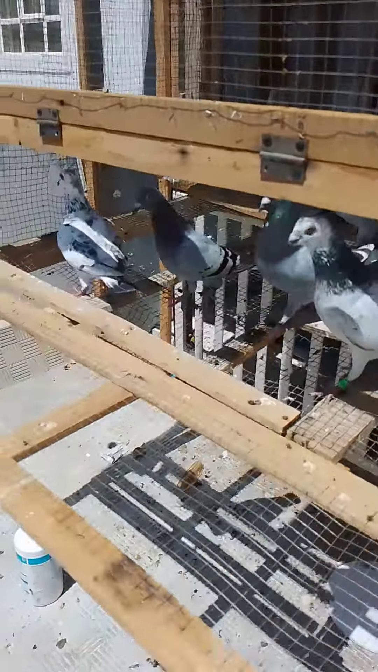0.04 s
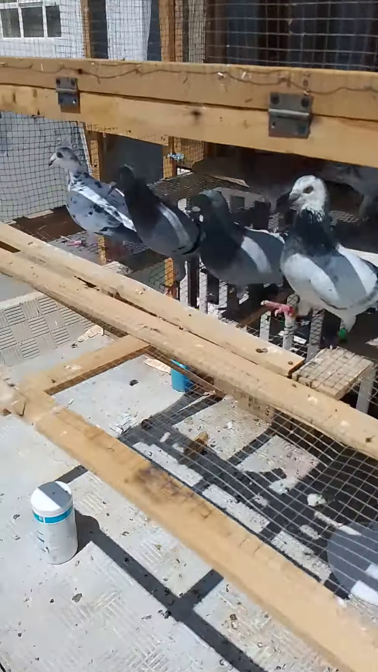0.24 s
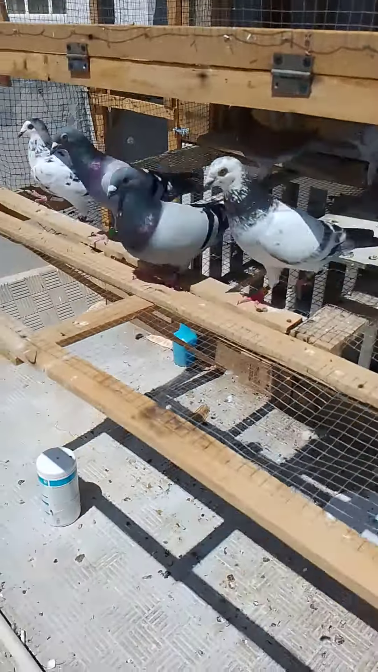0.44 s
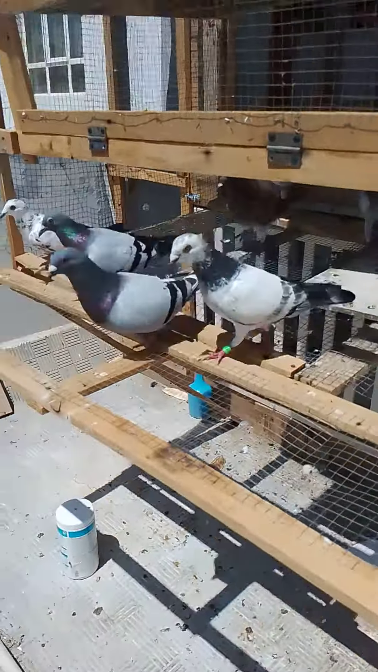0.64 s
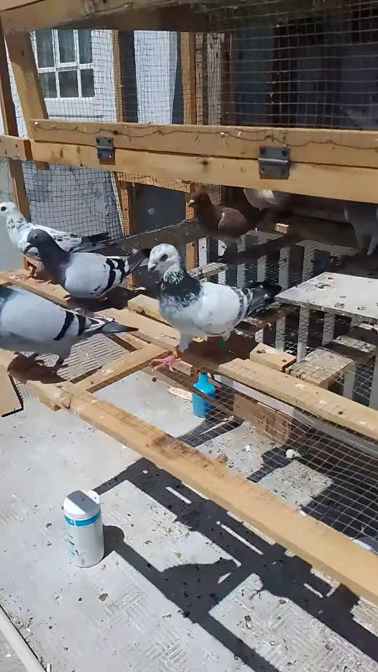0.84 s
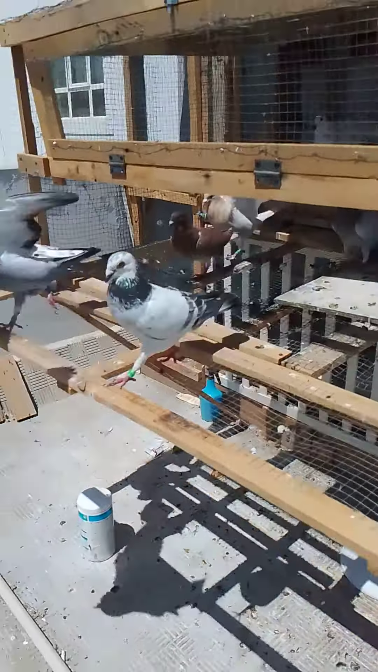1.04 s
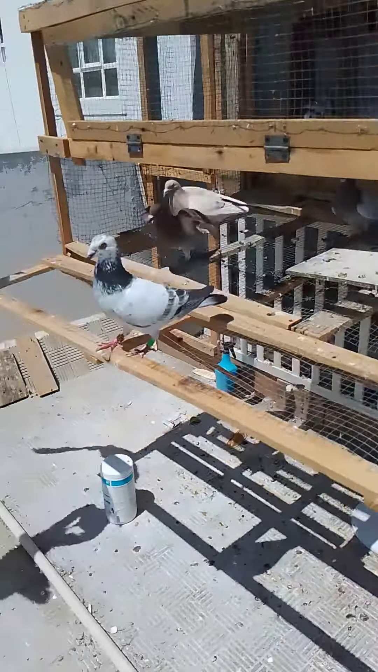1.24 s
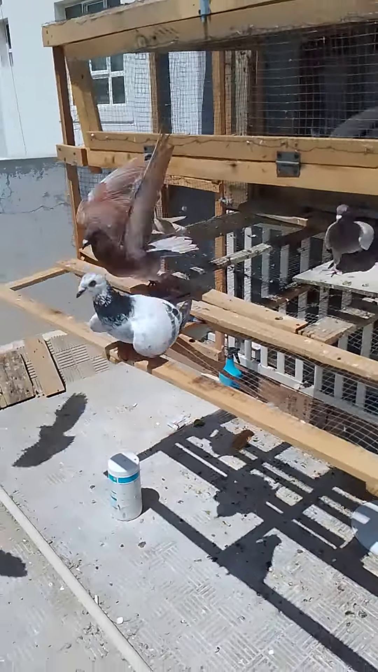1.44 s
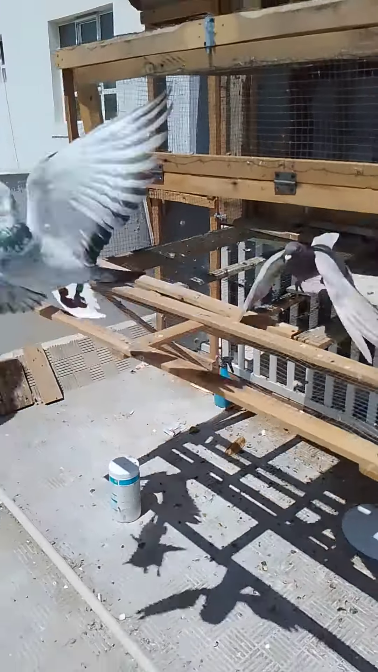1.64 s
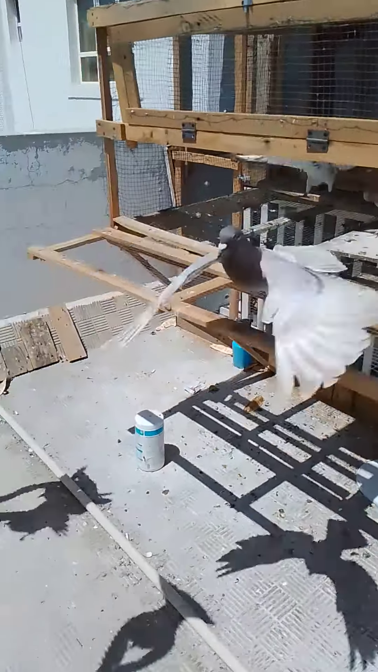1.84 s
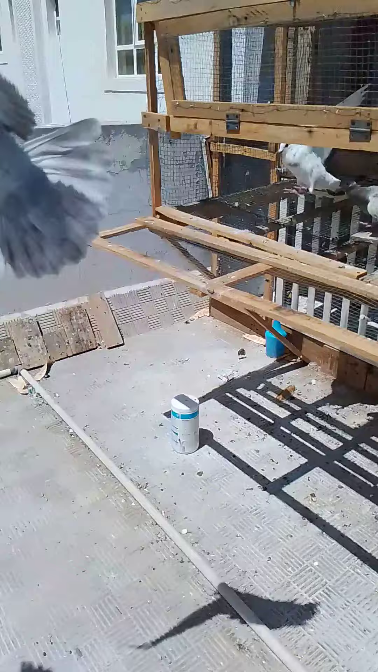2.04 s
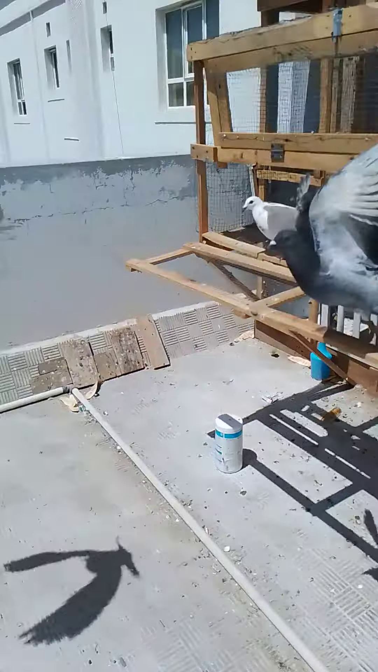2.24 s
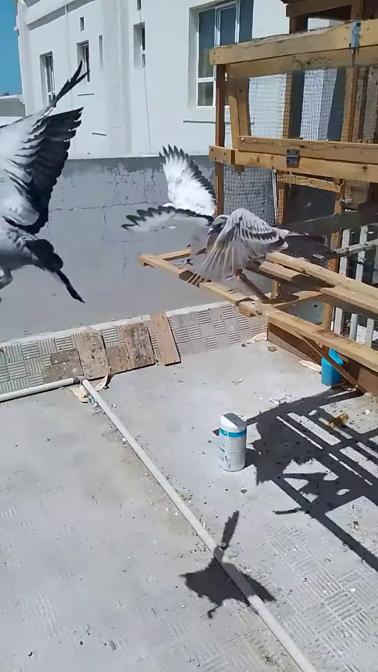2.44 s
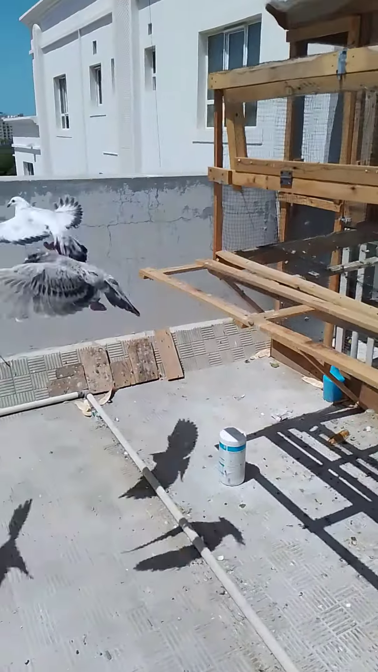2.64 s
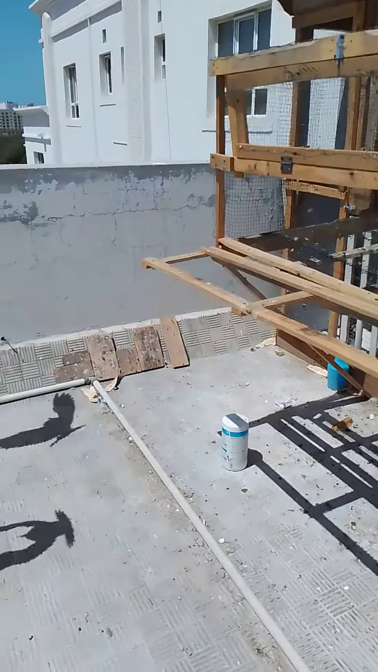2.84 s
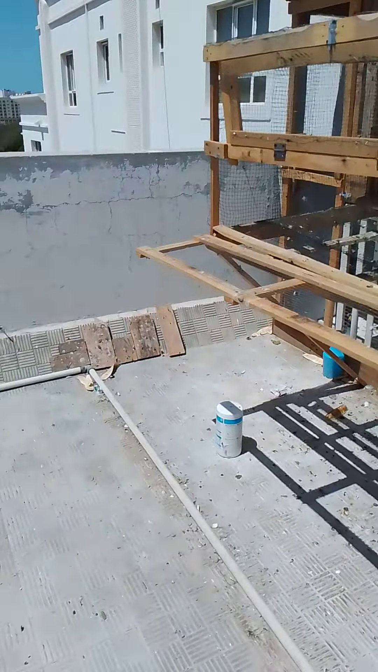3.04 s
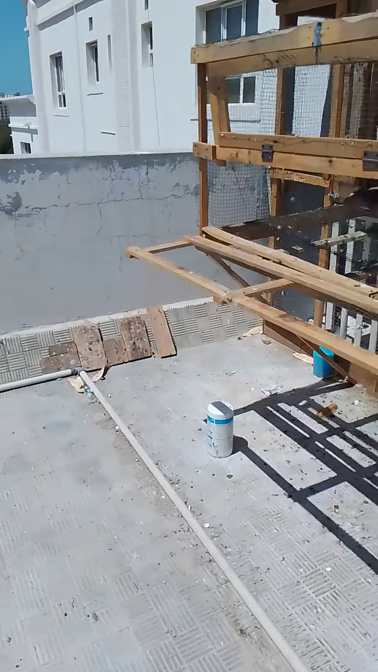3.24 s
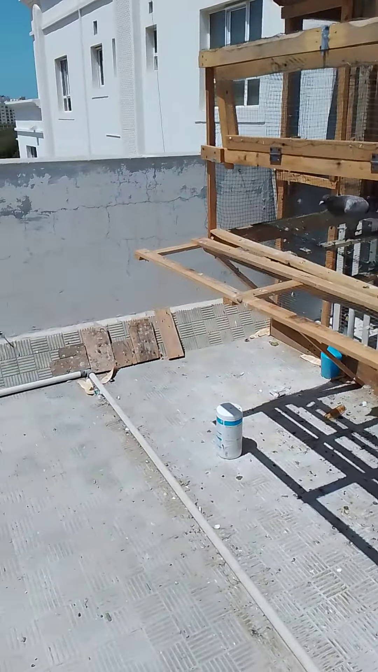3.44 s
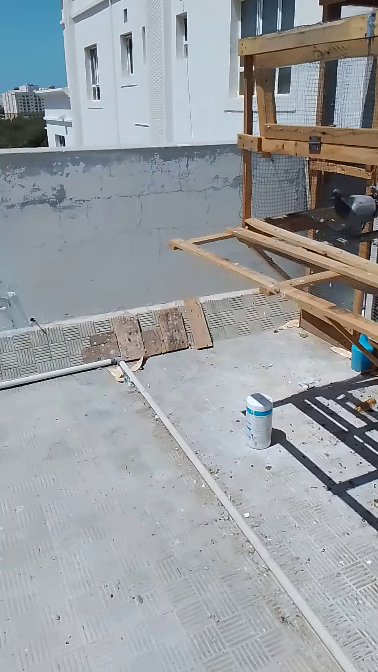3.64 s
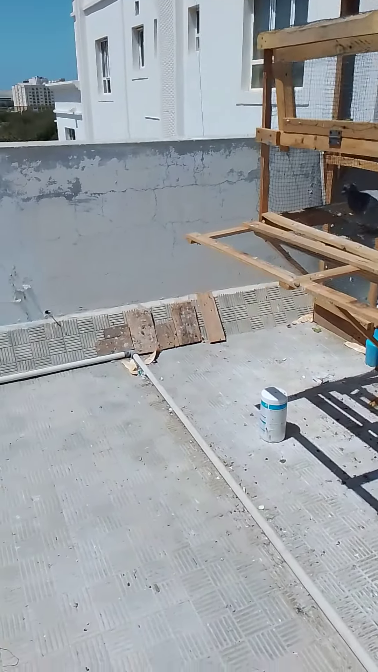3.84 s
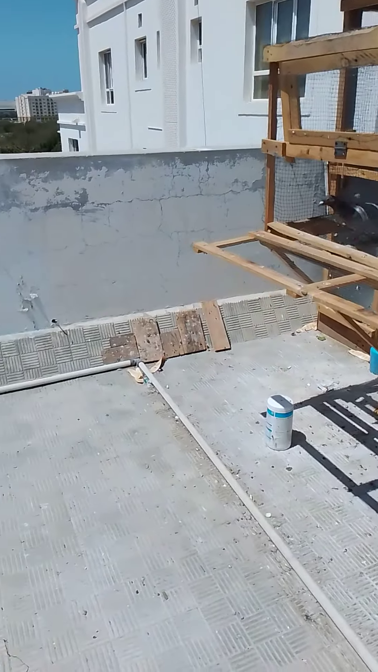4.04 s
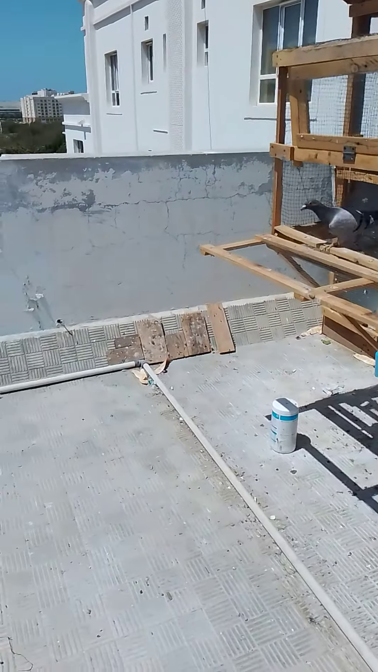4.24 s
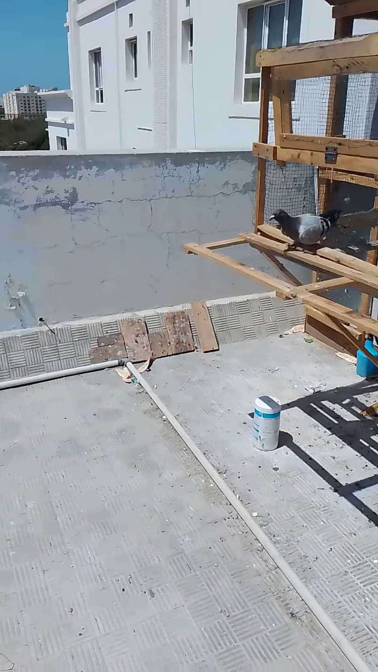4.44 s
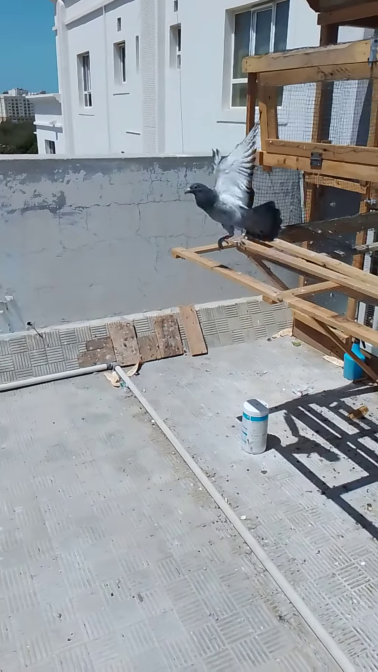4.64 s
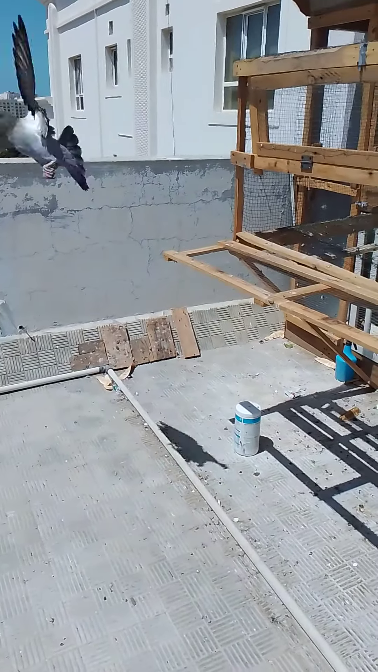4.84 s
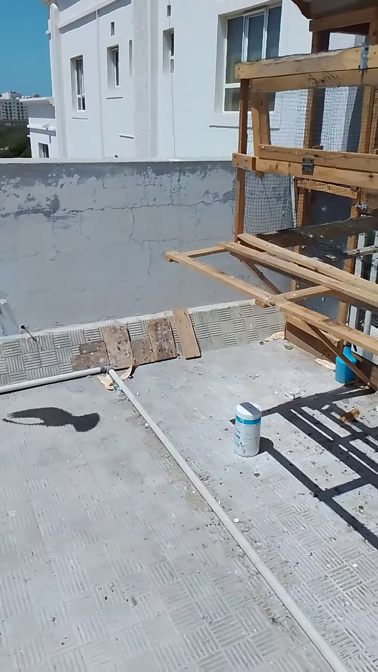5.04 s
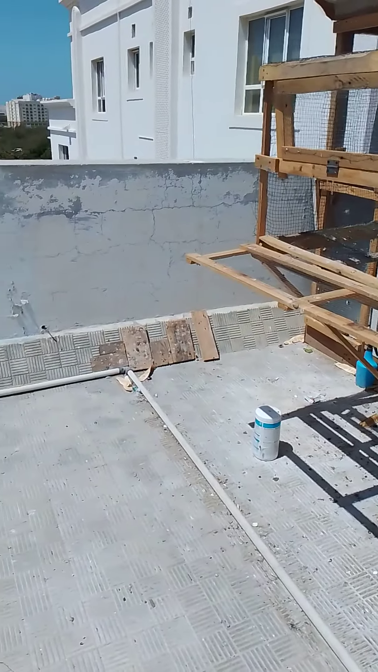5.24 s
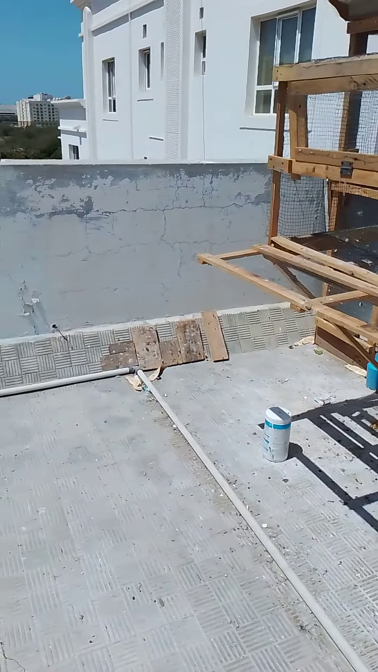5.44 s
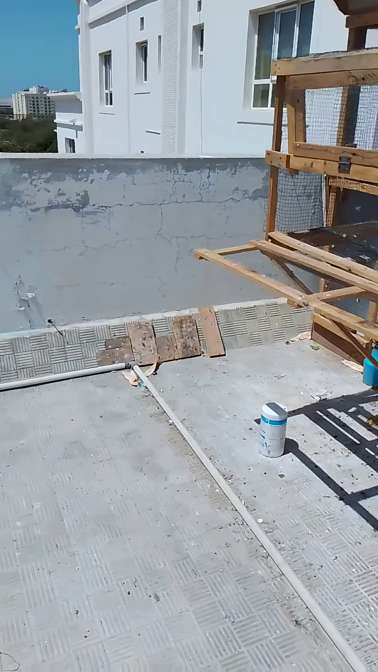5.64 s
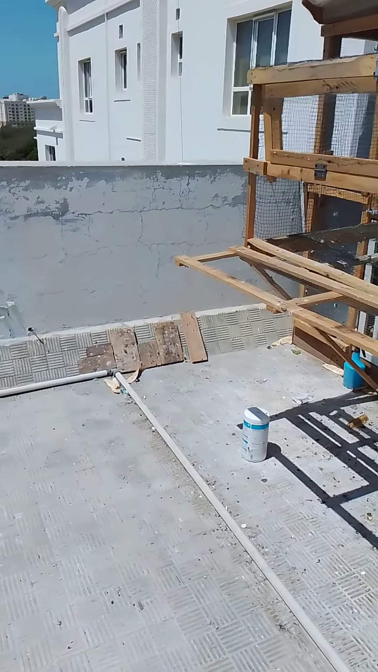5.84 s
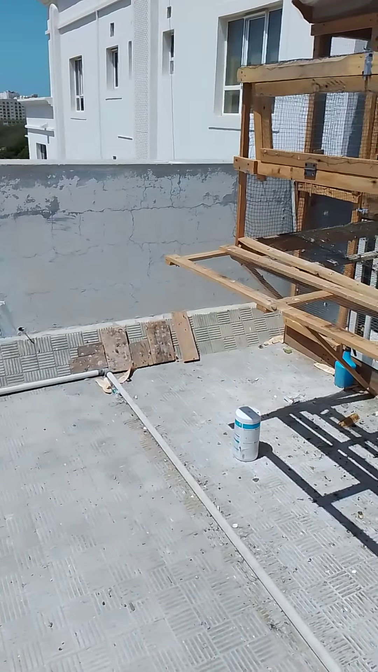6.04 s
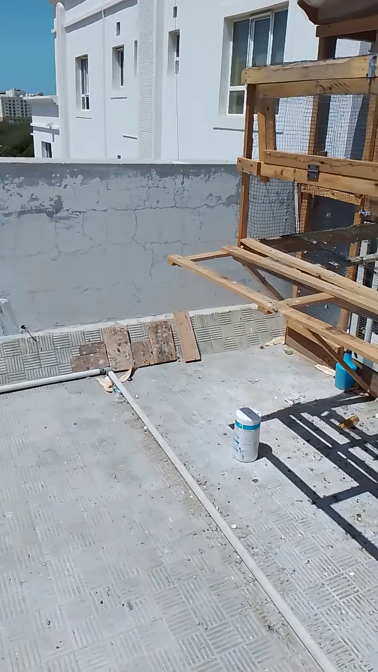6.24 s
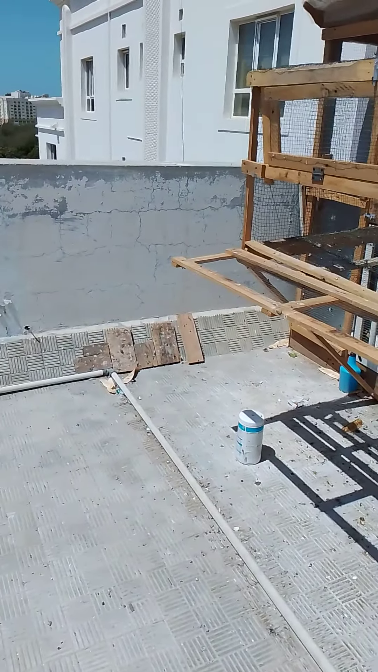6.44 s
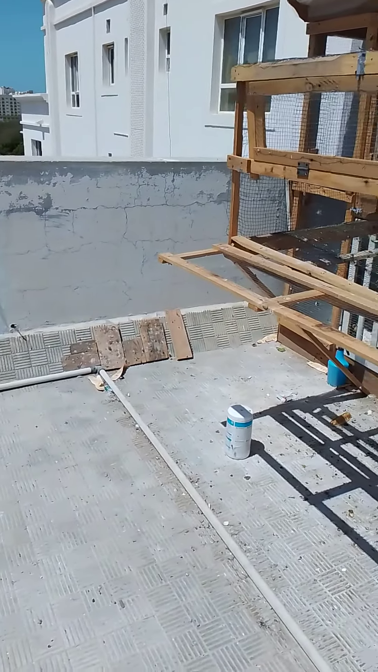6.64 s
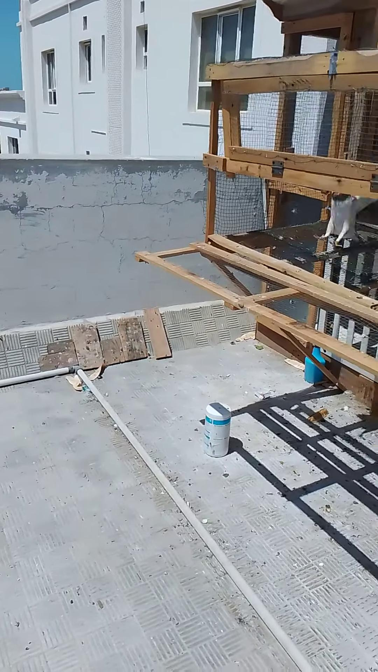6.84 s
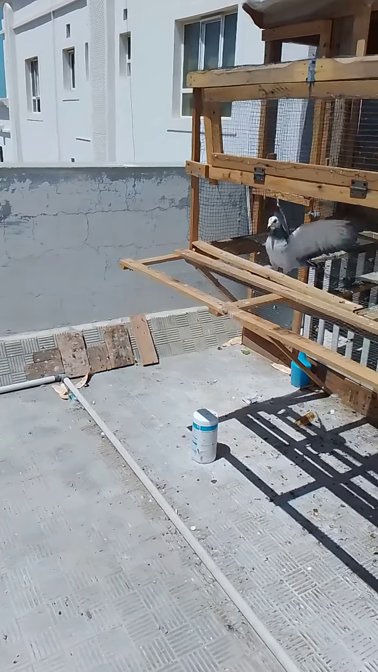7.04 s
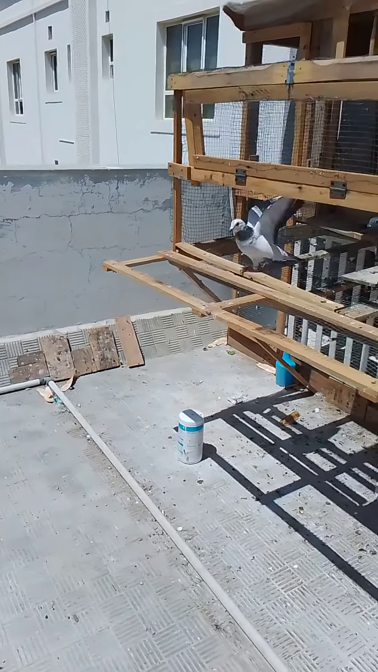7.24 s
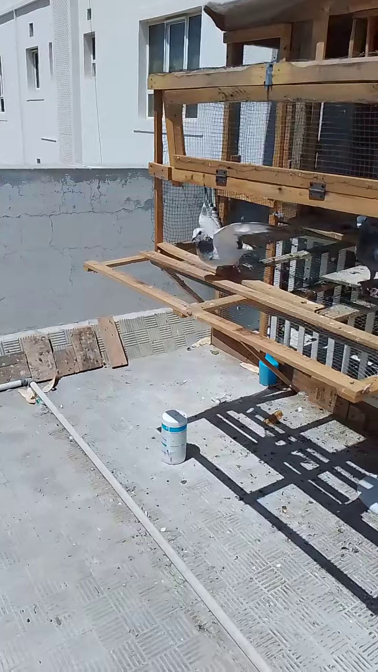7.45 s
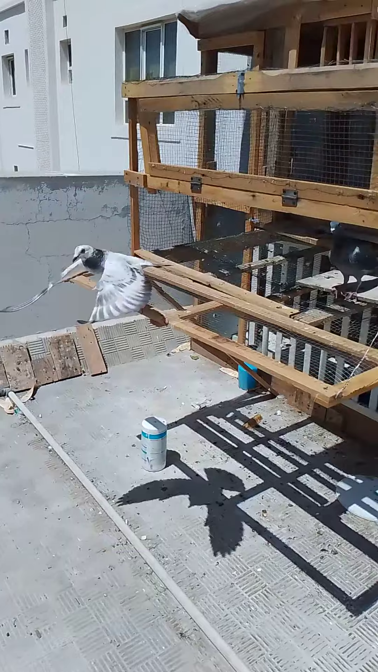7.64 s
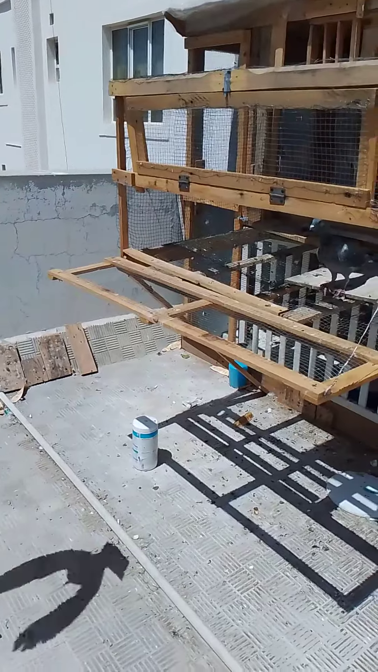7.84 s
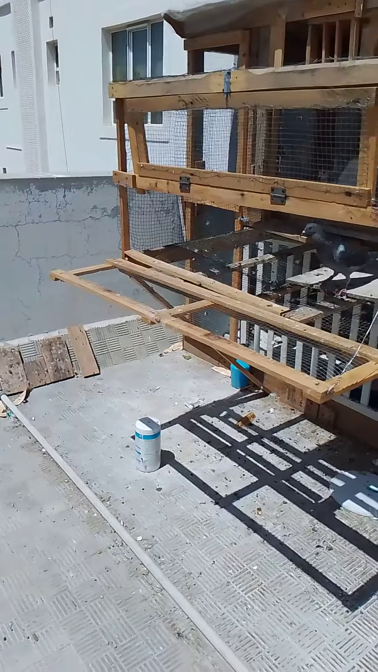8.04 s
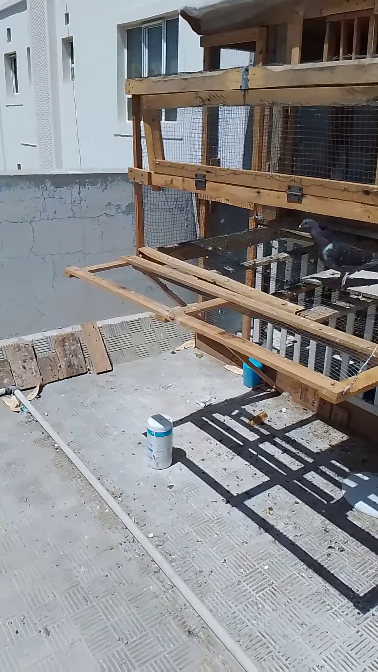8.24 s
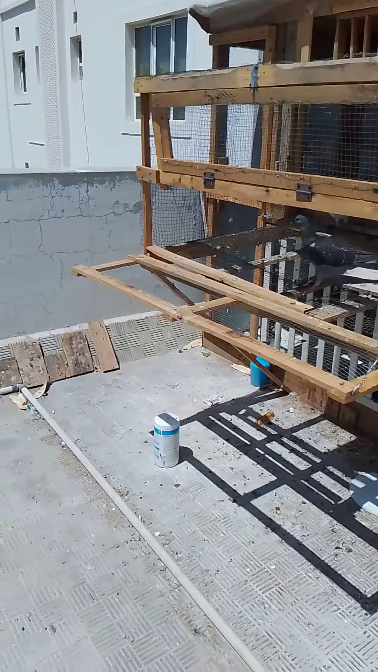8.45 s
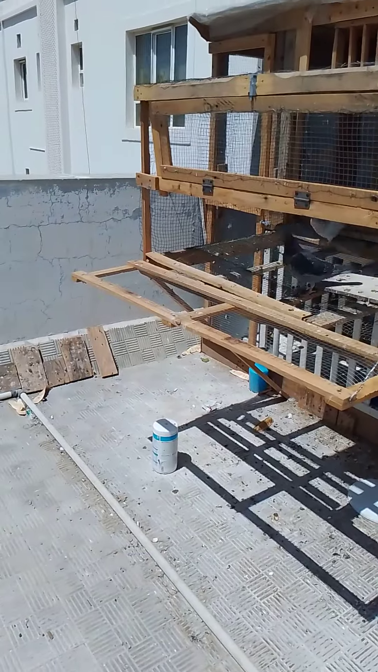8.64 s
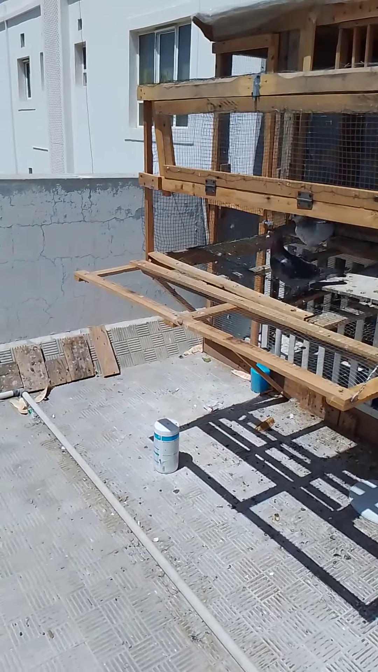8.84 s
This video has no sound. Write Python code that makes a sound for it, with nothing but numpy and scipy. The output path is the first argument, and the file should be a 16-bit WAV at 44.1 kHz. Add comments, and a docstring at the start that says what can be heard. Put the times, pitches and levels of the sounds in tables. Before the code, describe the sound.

Pigeons take off from a rooftop loft with swishing wing beats and sharp claps over a swelling rushing noise and low hum.

```python
"""A steady outdoor hum and a few ruffles of feathers, then pigeons leave a wooden loft on a flat roof.
They go one after another: feathers slide in a swish on each beat, wing tips meet in sharp claps,
and the walls answer each clap. Flight feathers squeak; air under a wing makes a few short, low whumps.
Behind them a broad rushing noise swells while the flock takes off."""
import sys
import numpy as np
from scipy import signal
from scipy.fft import rfft, irfft, next_fast_len
from scipy.io import wavfile
from scipy.ndimage import uniform_filter1d

SR = 44100
rng = np.random.default_rng(int(sys.argv[2]) if len(sys.argv) > 2 else 0)


def dump_mix(stems):
    """Bounce the given channels to the path in sys.argv[1] as a 16-bit WAV at rate SR."""
    frames = np.atleast_2d(stems).T  # one column per channel
    limited = np.clip(frames, -1, 1)  # hard clip at full scale
    pcm = np.round(limited * 32767).astype(np.int16)
    wavfile.write(sys.argv[1], SR, pcm)


N = 392931
TIME = np.arange(N) / SR


def from_db(db):
    """Decibels to gain."""
    return 10 ** (np.asarray(db) / 20)


def unit_power(x):
    """Scale a signal to unit power."""
    return x / np.sqrt(np.mean(x ** 2) + 1e-20)


def automation(rows, lag_s=0):
    """Draw a curve through timed breakpoints, one for each column after the time."""
    times, *columns = np.transpose(rows)
    return [np.interp(TIME - lag_s, times, column) for column in columns]


def drift(rate_hz, size):
    """A random wobble of unit power."""
    position = np.arange(size) * rate_hz / SR
    return unit_power(np.interp(position, np.arange(size), rng.standard_normal(size)))


def equalise(x, *curves):
    """Minimum-phase EQ: the sum of the curves, each drawn through (Hz, dB) points."""
    size = 2 * next_fast_len(len(x) // 2 + 1)
    log_hz = np.log(np.maximum(np.arange(size // 2 + 1) * SR / size, 1))
    gain_db = sum(np.interp(log_hz, np.log(hz), db) for hz, db in map(np.transpose, curves))
    cepstrum = irfft(np.log(from_db(gain_db)))
    cepstrum[1:size // 2] *= 2
    cepstrum[size // 2 + 1:] = 0  # no ringing ahead of an attack
    return irfft(rfft(x, size) * np.exp(rfft(cepstrum)))[:len(x)]


def add(out, start_s, sound):
    """Mix a sound in at its start time."""
    i = max(0, int(start_s * SR))
    out[i:i + len(sound)] += sound[:max(0, N - i)]


def grains(size, spread_db):
    """Gritty noise: dense, tiny contacts of uneven strength."""
    noise = rng.standard_normal(size)
    return unit_power(noise * from_db(spread_db * np.clip(drift(2500, size), -2, 2)))


def air(eq, grain_db, flutter_db, flutter_hz):
    """Coloured noise with a fine grain and an irregular flutter."""
    noise = equalise(grains(N, grain_db), eq)
    return unit_power(noise * from_db(flutter_db * drift(flutter_hz, N)))


# The tone of the hum. Each row: frequency in Hz, gain in dB.
HUM_EQ = [(15, -42), (24, -23), (39, -12), (55, -3.5), (73, -0.5), (105, -3.5), (135, -2.5), (170, -13),
          (260, -50)]
# The fader moves of the hum. Each row: time in seconds, relative level in dB.
HUM_LEVELS = [(0.0, -61), (0.62, -64), (2.08, -54), (4.47, -65.5), (5.53, -59), (5.71, -66), (7.69, -65),
              (7.77, -58), (8.91, -64)]
def outdoor_hum(gain_db):
    """A distant rumble that runs under the whole scene."""
    level_db, = automation(HUM_LEVELS)
    return from_db(gain_db + level_db) * air(HUM_EQ, grain_db=4, flutter_db=.5, flutter_hz=5.4)


# The rise and fall of the rush. Each row: time in seconds, relative level in dB.
RUSH_LEVELS = [(0.0, -39.5), (0.79, -38), (0.97, -36.5), (1.29, -30.5), (2.21, -28), (3.38, -39),
               (3.8, -39), (4.0, -41), (4.27, -43), (4.59, -41), (4.86, -38.5), (5.58, -37.5), (6.16, -41),
               (7.62, -39.5), (7.82, -37), (8.22, -35.5), (8.59, -38.5), (8.91, -36.5)]
def swell(amount, lag_s=0):
    """Gain that follows the rush around its calm level; amount scales the swing in dB."""
    calm_db = -40
    level_db, = automation(RUSH_LEVELS, lag_s)
    return from_db(amount * (level_db - calm_db))


def swirl(x, depth_db):
    """Narrow bands swell and fade on their own for some tens of milliseconds."""
    spectrum = signal.stft(x, nperseg=1024)[2]
    patches = uniform_filter1d(rng.standard_normal(spectrum.shape), size=5, axis=0)  # across pitch
    patches = unit_power(uniform_filter1d(patches, size=3, axis=1))  # across time
    return unit_power(signal.istft(spectrum * from_db(depth_db * patches), nperseg=1024)[1][:N])


# The hollow left by the floor echo. Each row: time in seconds, centre in Hz, depth from 0 to 1.
FLOOR_NOTCH = [(0, 726, 0.5), (.5, 657, 0.55), (1.0, 517, 0.37), (1.25, 480, 0)]
def floor_notch(x, width_hz):
    """The echo off the floor cancels one band, which shifts as the listener turns."""
    hz, depth = automation(FLOOR_NOTCH)
    carrier = np.exp(2j * np.pi * np.cumsum(hz) / SR)
    pole = np.exp(-np.pi * width_hz / SR)
    band = 2 * np.real(carrier * signal.lfilter([1 - pole], [1, -pole], x / carrier))
    return x - np.clip(depth, 0, 1) * band


# The tones of the three layers of the rush. Each row: frequency in Hz, gain in dB.
BODY_EQ = [(88, -69), (150, -19), (167, -21), (218, -5.5), (297, 0.5), (490, -3.5), (545, -6), (746, -7),
           (900, -10.5), (1170, -30), (1980, -120)]
MIDDLE_EQ = [(380, -29), (650, -4.5), (766, -2.5), (1100, 3), (1550, -0.2), (2030, 1), (2210, -2),
             (2810, -1), (3310, -5), (4210, -9.5), (4820, -22.5), (5260, -19), (6500, -29), (8450, -39.5),
             (14300, -120)]
RUSTLE_EQ = [(3240, -26), (5500, -8), (7350, -17), (9240, -8), (12600, -21), (15200, -18), (16000, -28)]
def rush(body_db, middle_db, rustle_db):
    """A swelling rush: a broad middle, a low body that trails it and a fine rustle on top."""
    body = swirl(air(BODY_EQ, grain_db=1.8, flutter_db=1.33, flutter_hz=25.03), depth_db=2)
    body *= from_db(body_db) * swell(amount=.84, lag_s=.14)
    middle = swirl(air(MIDDLE_EQ, grain_db=1.2, flutter_db=.63, flutter_hz=39.65), depth_db=2.5)
    middle *= from_db(middle_db) * swell(amount=.94)
    rustle = air(RUSTLE_EQ, grain_db=.5, flutter_db=2.2, flutter_hz=35)
    rustle *= from_db(rustle_db) * swell(amount=1.3)
    return floor_notch(body + middle, width_hz=500) + rustle


# The tone of a struck wing. Each row: frequency in Hz, gain in dB.
WING_EQ = [(60, -28.5), (170, -33), (250, -3.5), (500, -3), (800, -4.5), (1300, 0.5), (2000, -1.5),
           (3000, 0), (4200, -4.5), (5500, -11), (7500, -21.5), (9200, -18.5), (13000, -33), (15500, -30.5)]
def wing(force, low_db, treble_db, crack_hz):
    """A force on the feathers: a broad blow has more lows, a blow of the tips more treble."""
    shelves = [(650, low_db), (1200, 0), (3800, 0), (6000, treble_db)]
    crack = [(crack_hz / 2, -3), (crack_hz, 2.5), (crack_hz * 2, -3)]
    unshelved = equalise(force, WING_EQ, crack)
    return equalise(force, WING_EQ, shelves, crack) / np.linalg.norm(unshelved)


def flicks(per_s, gain_db, spread_db, fade_s, treble_db):
    """Countless small flicks of feathers and claws, louder when the flock is busy."""
    triggers = rng.random(N) < per_s / SR
    strength = from_db(spread_db * np.clip(rng.standard_normal(N), -2, 1.5))
    envelope = signal.lfilter([1], [1, -np.exp(-1 / (fade_s * SR))], triggers * strength + 1e-18)
    crackle = wing(envelope * rng.standard_normal(N), low_db=1, treble_db=treble_db, crack_hz=2700)
    return from_db(gain_db) * swell(amount=1.31) * unit_power(crackle)


# Slaps off the nearby floor and boards. Each row: typical delay in seconds, gain in dB.
ECHOES = [(.0036, -5.5), (0.0112, -13.5)]
def roof_echoes(x, build_s, tail_db=-5, near_s=.027, t60_s=.26):
    """Hard surfaces echo at once, with delays set by the bird's place; the walls add a diffuse tail."""
    t = TIME[:len(x)]
    near = np.exp(-(t / near_s) ** 4)  # dense reflections from the loft and parapet
    late = from_db(-120 * t / t60_s)  # a power, so this is 60 dB down at t60_s
    decay = (near + late) * (1 - np.exp(-t / build_s)) ** 2
    tail_power = np.abs(signal.fftconvolve(x ** 2, decay / decay.sum())[:len(x)])
    out = x + from_db(tail_db) * np.sqrt(tail_power) * grains(len(x), spread_db=1)
    for delay_s, db in ECHOES:
        out += from_db(db) * np.interp(t - delay_s * rng.uniform(.8, 1.2), t, x, left=0)
    return out


def swish(low_db, treble_db, rise_s, fade_s, crack_hz):
    """Feathers slide over each other in a brief, grainy swish, each with a colour of its own."""
    t = TIME[:8192]
    force = grains(len(t), spread_db=5) * (1 - np.exp(-t / rise_s)) * np.exp(-t / fade_s)
    echoed = roof_echoes(force, build_s=.0055)
    return wing(echoed, low_db, treble_db, crack_hz * 2 ** rng.normal(0, .14))


# Single shakes of the feathers. Each row: start in seconds, relative level in dB,
# low trim in dB, treble trim in dB, fade time in seconds.
RUFFLES = [(.038, -30.5, -15, -23, .017), (.369, -23, -13, -22, 0.016), (.476, -29.5, -17, -18, .016),
           (.536, -33, -20, -23, 0.0052), (.578, -37.5, -9, -11, .004), (1.592, -21.5, -6, -21, 0.02),
           (1.807, -26, -9, -17, 0.029), (2.222, -26, -13, -19, 0.036), (2.327, -25, -4, -14, .017),
           (2.937, -29, -2.5, -20, 0.0051), (3.92, -29.5, -14, -15, 0.0059), (3.953, -29.5, -8, -18, .008),
           (4.488, -36.5, -13, -8, .016), (4.745, -36, -4, -16, 0.0064), (4.905, -32, -2.5, -18, .007),
           (5.111, -35, -5, -17, .014), (6.05, -39, -15, -15, .013), (6.171, -35.5, -13, -19, 0.013),
           (6.39, -35.5, -10, -11, 0.032), (6.804, -32, -2, -16, 0.0096), (7.005, -32, -14, -20, 0.036),
           (7.4, -38, -2, -22, .005), (7.6, -29, -14, -17, 0.039), (7.742, -28.5, -3, -19, 0.0083),
           (7.865, -29, -5.5, -18, 0.0065)]
def ruffles(gain_db, low_db, treble_db):
    """A bird shakes or stretches a wing: one swish with a soft attack."""
    out = np.zeros(N)
    for start_s, db, low, treble, fade_s in RUFFLES:
        ruffle = swish(low + low_db, treble + treble_db, rise_s=.0018, fade_s=fade_s, crack_hz=2420)
        add(out, start_s, from_db(db + gain_db) * ruffle)
    return out


# Runs of wing beats. Each row: first and last beat in seconds, number of beats,
# relative levels of the first and last in dB, low trim in dB, treble trim in dB.
FLIGHTS = [(.905, 1.046, 3, -26.5, -31.5, -10, -19), (1.142, 1.325, 3, -27.5, -23.5, -8, -21),
           (1.493, 1.68, 3, -28, -26, -5, -19), (1.859, 2.016, 3, -27, -26.5, -5, -23),
           (2.16, 2.493, 4, -28, -28, -11, -14), (2.595, 2.687, 2, -26, -29, -7, -10),
           (3.416, 3.758, 4, -31.5, -34, -2.5, -14.5), (4.69, 4.847, 3, -38.5, -34.5, -4.5, -16),
           (4.95, 5.392, 5, -31.5, -45, -10, -14), (5.497, 5.745, 4, -32, -35.5, -8, -16),
           (7.687, 8.845, 12, -33.5, -36, -6.5, -11.5)]
def wing_beats(gain_db, low_db, treble_db):
    """A swish on every beat; each run slows down as its level ramps from first beat to last."""
    slowing = 1.018  # each gap over the one before
    out = np.zeros(N)
    for first_s, last_s, beats, first_db, last_db, low, treble in FLIGHTS:
        stretch = slowing ** np.arange(round(beats)) - 1
        for progress in stretch / stretch[-1]:
            start_s = first_s + progress * (last_s - first_s)
            db = first_db + progress * (last_db - first_db)
            beat = swish(low + low_db, treble + treble_db, rise_s=.0011, fade_s=.0068, crack_hz=2500)
            add(out, start_s, from_db(db + gain_db) * beat)
    return out


# Beats on which the wings meet. Each row: cue in seconds, relative level in dB,
# low trim in dB, treble trim in dB, quill rattle time in seconds.
CLAPS = [(1.1137, -25.5, -19, -20, .005), (1.21, -21.5, -8, -8.5, .006), (1.221, -21.5, 1, -20, .003),
         (1.493, -24.5, -14, -10.5, 0.0053), (1.6464, -28, -11, -15, .002), (1.6652, -25.5, -5, -16, .006),
         (1.68, -22, -8, -17, 0.0045), (2.163, -27.5, 1, -6, 0.0044), (2.3834, -27.5, -3.5, -19, 0.0031),
         (2.775, -26, -15, -23, 0.0037), (2.9842, -29.5, -6.5, -9.5, .004), (3.091, -22.5, -10, -9, .006),
         (3.209, -22, -12, -13.5, 0.0064), (3.414, -24, -11, -11, .005), (3.6423, -32.5, -10, -10, .006),
         (4.689, -31, -8, -13, .003), (5.1702, -29.5, -22, -10.5, 0.0045), (5.3954, -26, -8, -12, 0.0082),
         (7.686, -32, -13, -12, .003), (7.9764, -17, -11.5, -15.5, 0.0037),
         (8.08, -25.5, -6.5, -14, 0.0039), (8.1842, -22.5, -8, -12.5, 0.0018),
         (8.289, -22.5, -2.5, -21.5, .002), (8.397, -21.5, -5, -16.5, .002),
         (8.5065, -24.5, -4.5, -12, .003), (8.6172, -29, -7, -3.5, .003), (8.8454, -32, -15, -8.5, .003)]
def wing_claps(gain_db, low_db, treble_db, rattle_db, delay_s):
    """The wings meet in one sharp snap, then the quills slap together for a few milliseconds."""
    out, t = np.zeros(N), TIME[:10240]
    for cue_s, db, low, treble, rattle_s in CLAPS:
        force = from_db(rattle_db) * grains(len(t), spread_db=3.5) * np.exp(-(t / rattle_s) ** 2)
        force[0] -= 1  # the snap
        crack_hz = 2660 * 2 ** (.027 * treble)  # a duller clap cracks lower
        clap = wing(roof_echoes(force, build_s=.0031), low + low_db, treble + treble_db, crack_hz)
        add(out, cue_s + delay_s, from_db(db + gain_db) * clap)
    return out


def glide(length_s, start_hz, end_hz, jitter, jitter_hz, overtone_db):
    """A short, unsteady sliding tone with a weak second harmonic."""
    size = int(length_s * SR)
    hz = np.geomspace(start_hz, end_hz, size) * (1 + jitter * drift(jitter_hz, size))
    phase = 2 * np.pi * np.cumsum(hz) / SR
    tone = np.sin(phase) + from_db(overtone_db) * np.sin(2 * phase)
    return signal.windows.tukey(size, .8) * tone


# Feather whistles. Each row: start and length in seconds, first and last pitch in Hz, level in dB.
SQUEAKS = [(2.02, 0.036, 1150, 783, -28), (2.075, 0.053, 1272, 967, -27), (2.15, .043, 1260, 1054, -29),
           (2.205, .037, 1028, 957, -26), (2.43, 0.026, 3440, 3450, -21.5), (2.774, 0.016, 2920, 2690, -22),
           (4.742, 0.034, 1860, 1784, -31), (5.83, 0.085, 2460, 2440, -36), (6.81, 0.053, 928, 883, -35.5)]
def feather_squeaks():
    """Flight feathers whistle and squeak in brief, thin tones."""
    out = np.zeros(N)
    for start_s, length_s, start_hz, end_hz, db in SQUEAKS:
        squeak = glide(length_s, start_hz, end_hz, jitter=.052, jitter_hz=887, overtone_db=-35)
        add(out, start_s, from_db(db) * squeak)
    return out


# Puffs of air on a downstroke. Each row: start and length in seconds, first pitch in Hz, level in dB.
WHUMPS = [(2.985, 0.058, 423, -32.5), (3.067, 0.027, 430, -31.5), (3.237, 0.032, 403, -33.5),
          (3.834, 0.043, 657, -37), (3.855, 0.039, 428, -31.5), (4.815, .042, 436, -37),
          (5.023, .04, 473, -35.5), (8.055, 0.043, 448, -32.5)]
def wing_whumps(fall_ratio):
    """Short, low, hoot-like whumps of air under a wing, all sinking by the same interval."""
    out = np.zeros(N)
    for start_s, length_s, hz, db in WHUMPS:
        whump = glide(length_s, hz, hz * fall_ratio, jitter=.14, jitter_hz=449, overtone_db=-10)
        add(out, start_s, from_db(db) * whump)
    return out


def scene():
    """The birds on the roof over a bed of hum and rush, in mono."""
    mix = outdoor_hum(gain_db=-.7)
    mix += rush(body_db=-46, middle_db=-40, rustle_db=-68)
    mix += flicks(per_s=30, gain_db=-56.5, spread_db=3.5, fade_s=.0045, treble_db=9)
    mix += ruffles(gain_db=27.5, low_db=9.5, treble_db=15.5)
    mix += wing_beats(gain_db=27.6, low_db=9.5, treble_db=14.5)
    mix += wing_claps(gain_db=28.5, low_db=10.5, treble_db=14, rattle_db=-9.5, delay_s=.0007)
    mix += feather_squeaks()
    mix += wing_whumps(fall_ratio=.795)
    return mix[None]


def record(dry):
    """The microphone has a narrow dip in the bass; the top is cut above 16 kHz."""
    dipped = equalise(dry[0], [(125, 2.0), (155, -8.5), (195, -0.5)])
    high_cut = signal.ellip(10, .2, 70, 16000, fs=SR, output="sos")
    return signal.sosfilt(high_cut, dipped)[None]


dry = scene()
out = record(dry)
dump_mix(out)
```